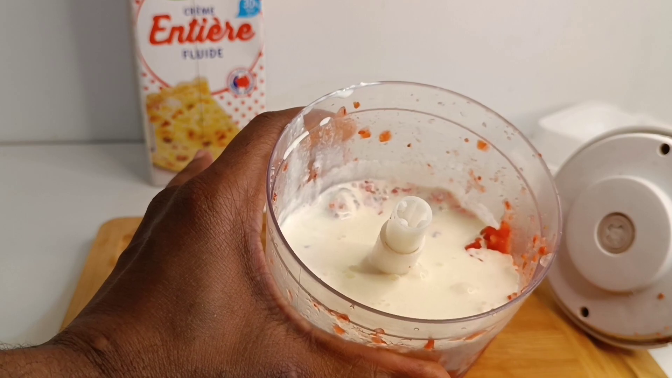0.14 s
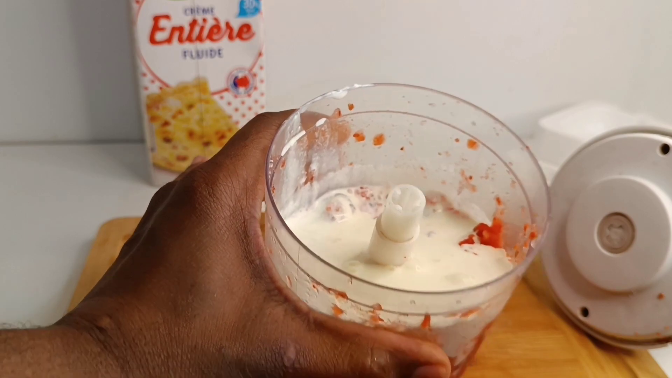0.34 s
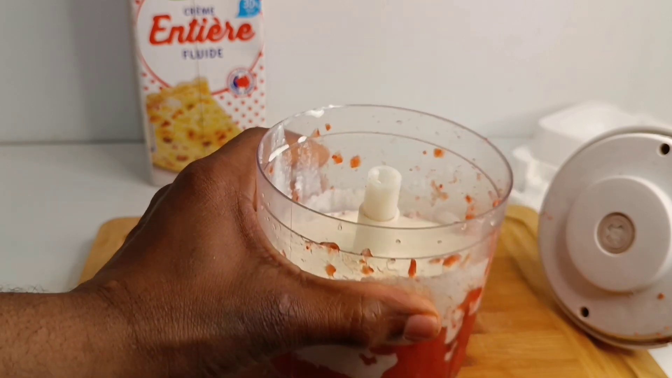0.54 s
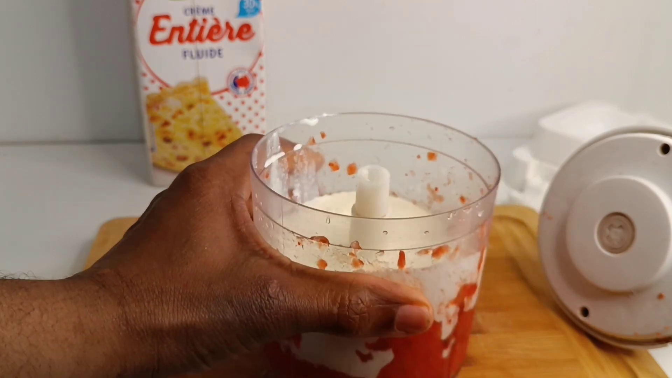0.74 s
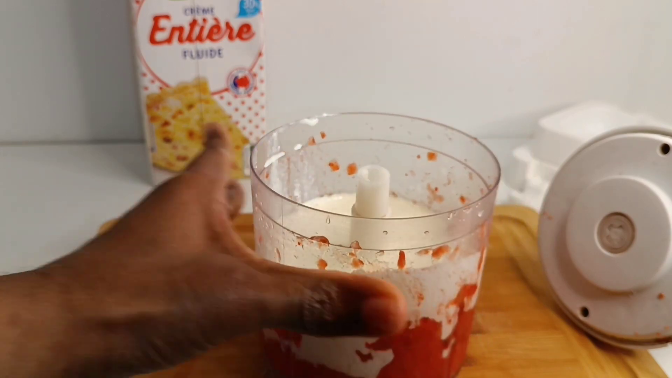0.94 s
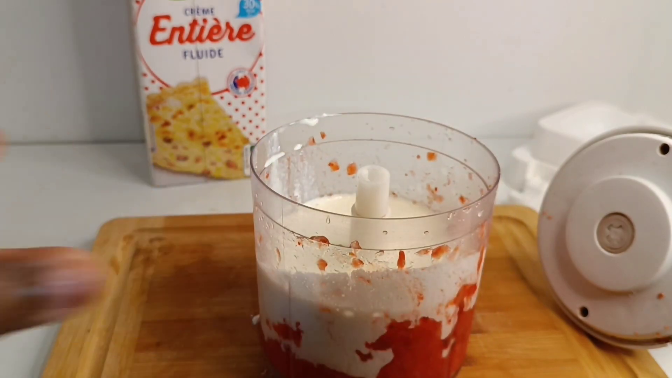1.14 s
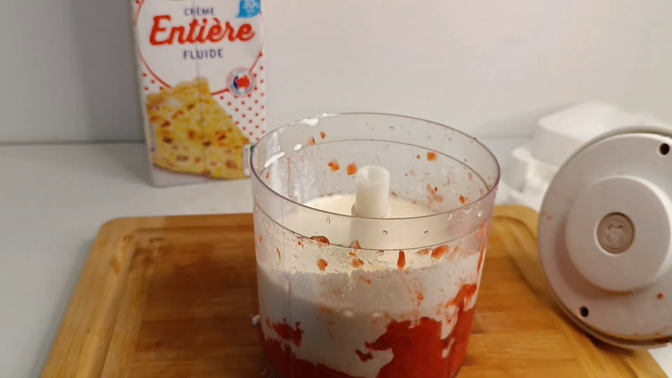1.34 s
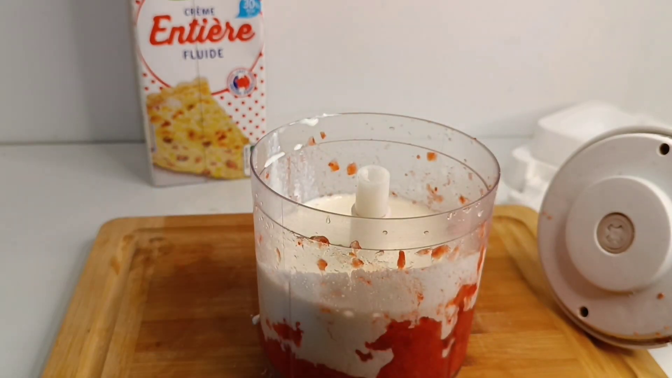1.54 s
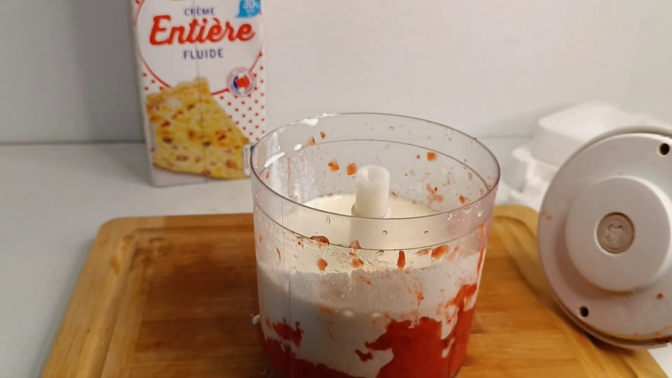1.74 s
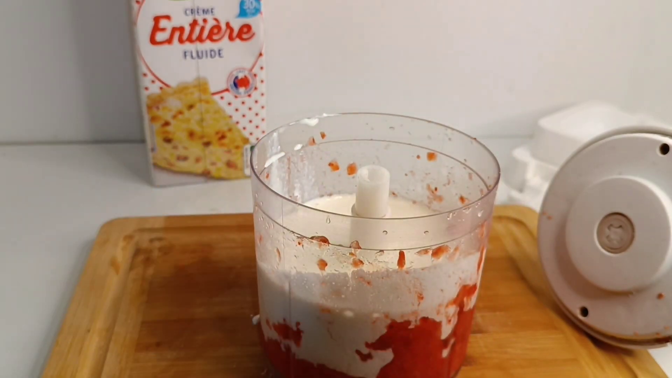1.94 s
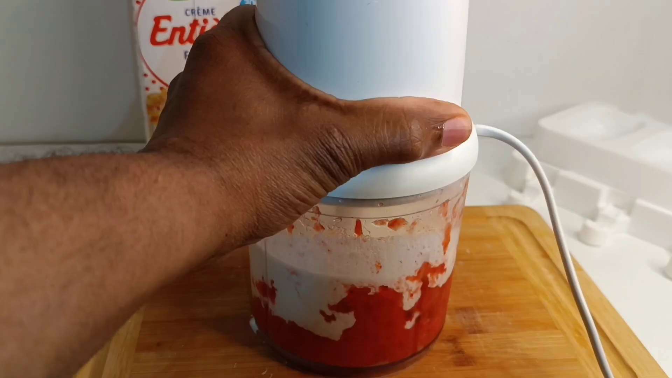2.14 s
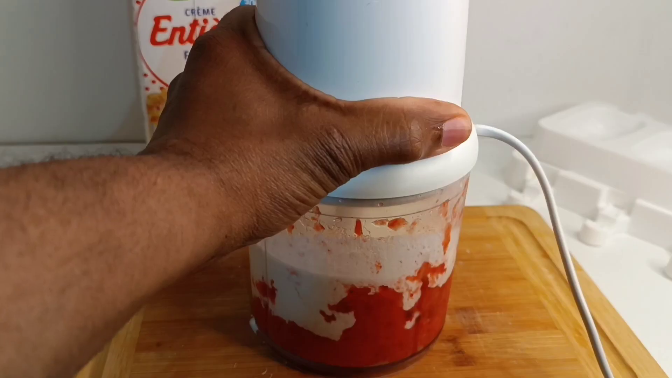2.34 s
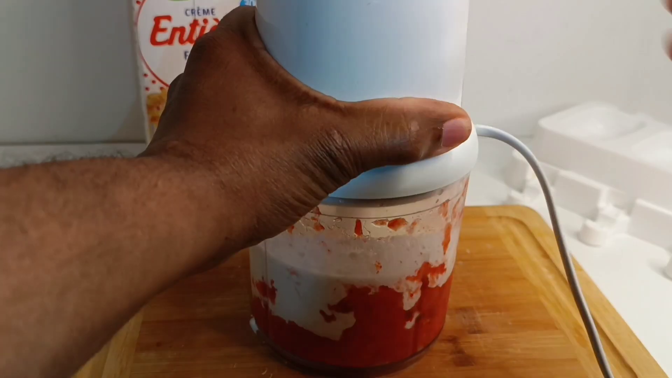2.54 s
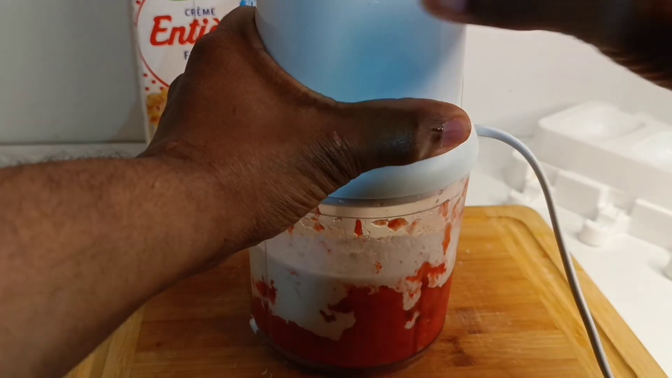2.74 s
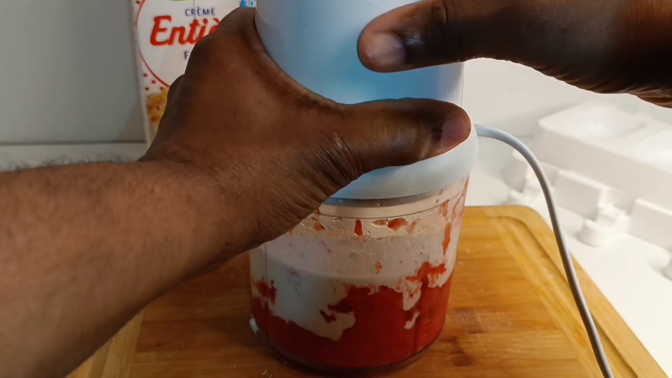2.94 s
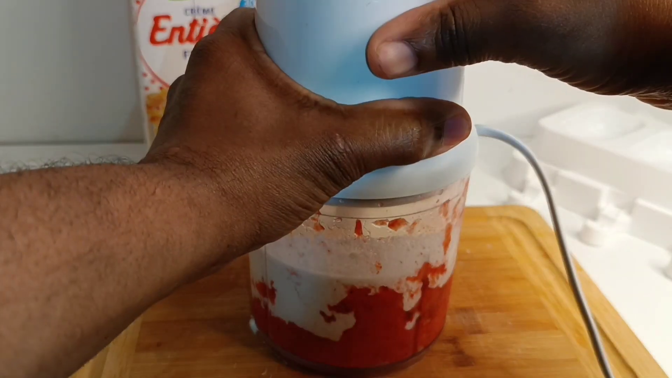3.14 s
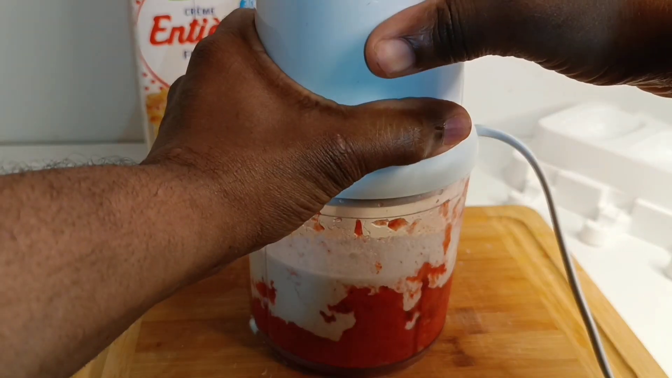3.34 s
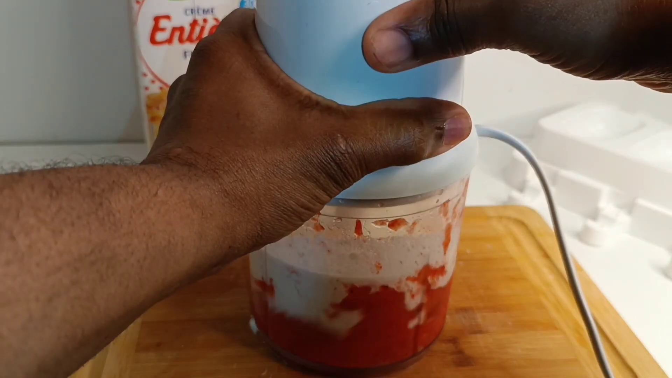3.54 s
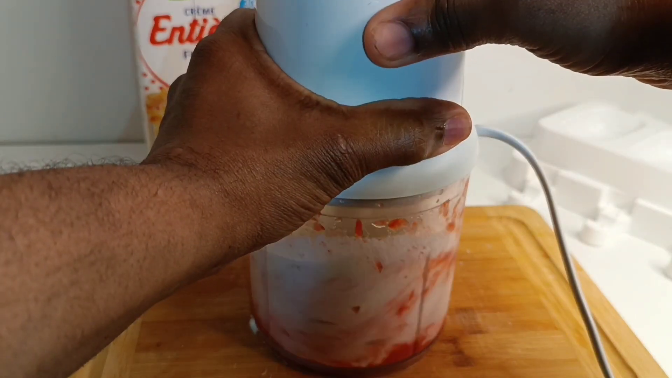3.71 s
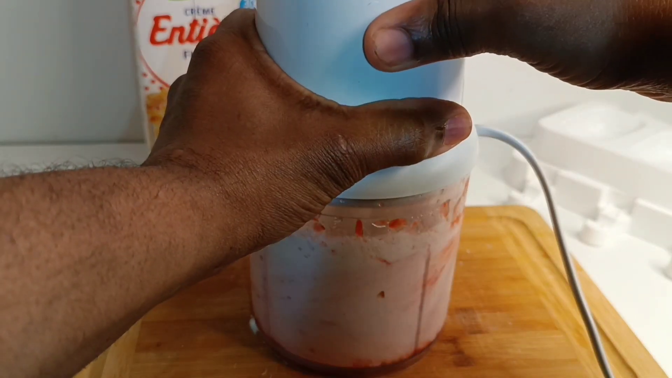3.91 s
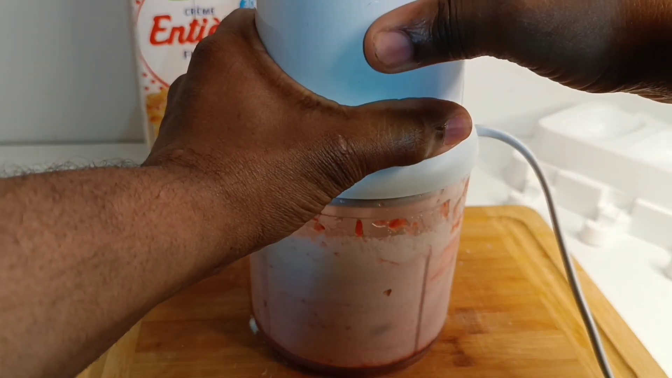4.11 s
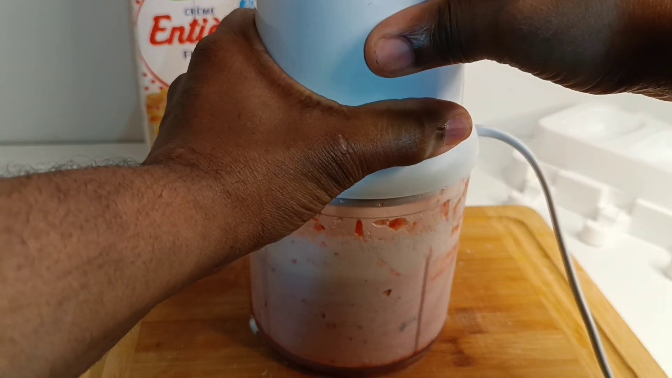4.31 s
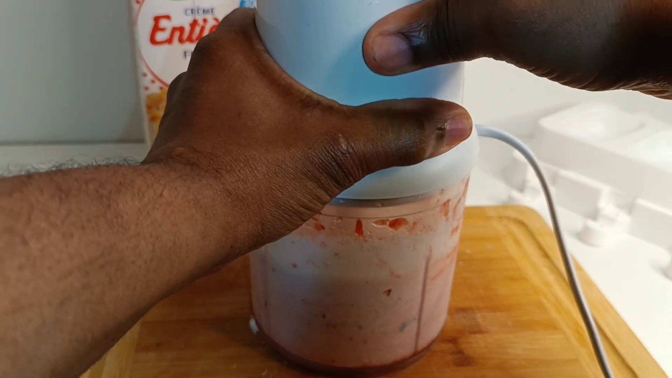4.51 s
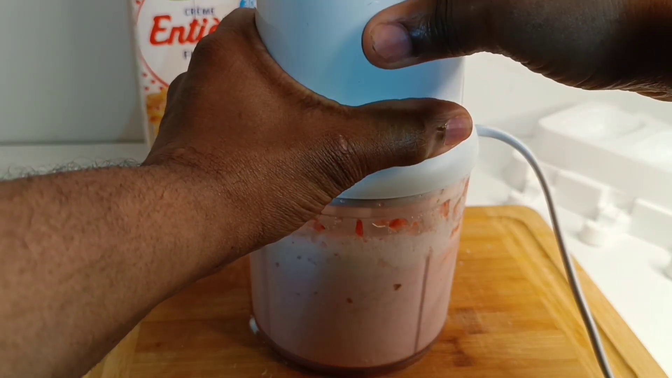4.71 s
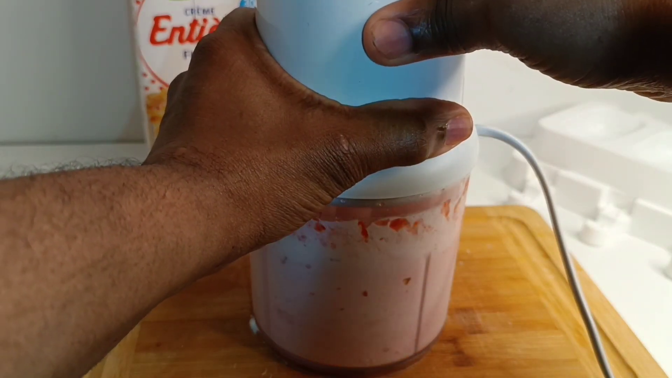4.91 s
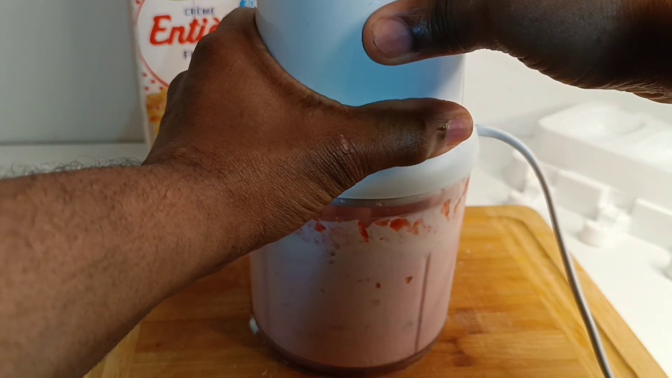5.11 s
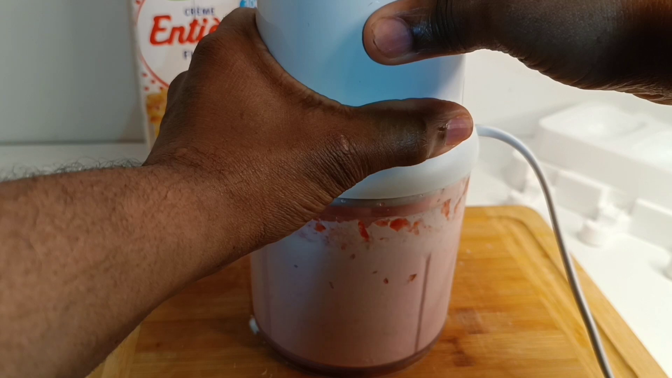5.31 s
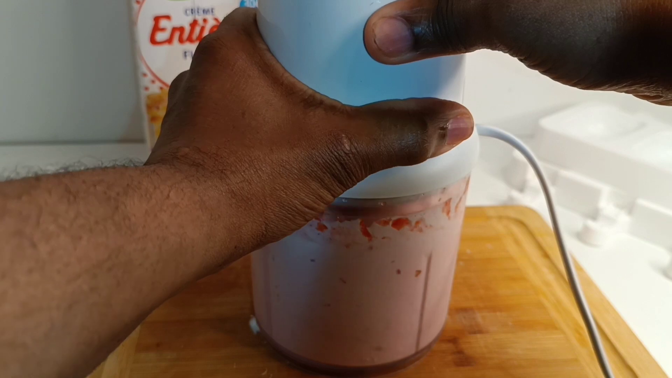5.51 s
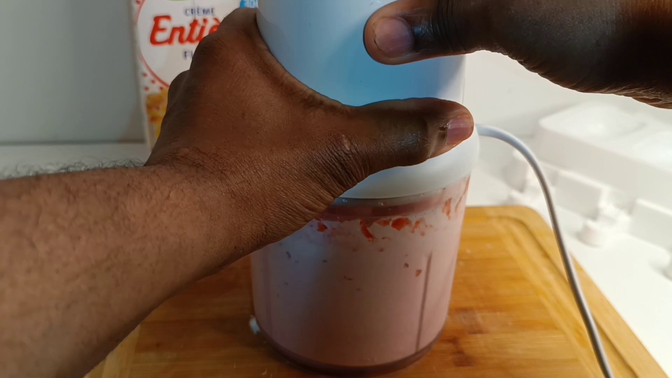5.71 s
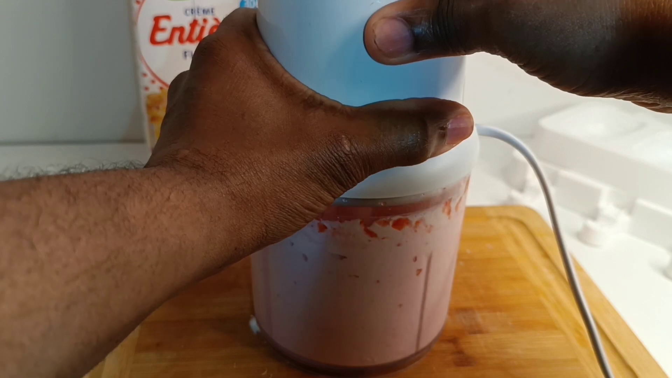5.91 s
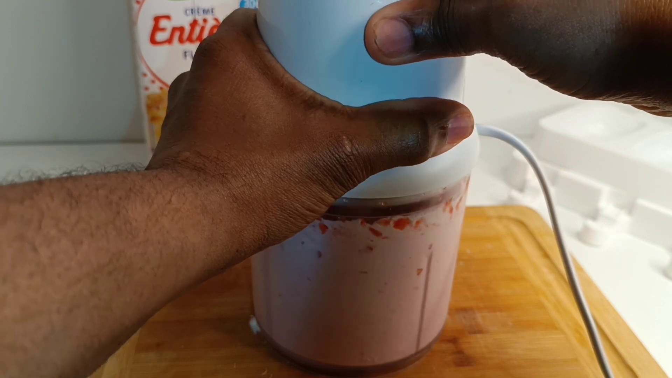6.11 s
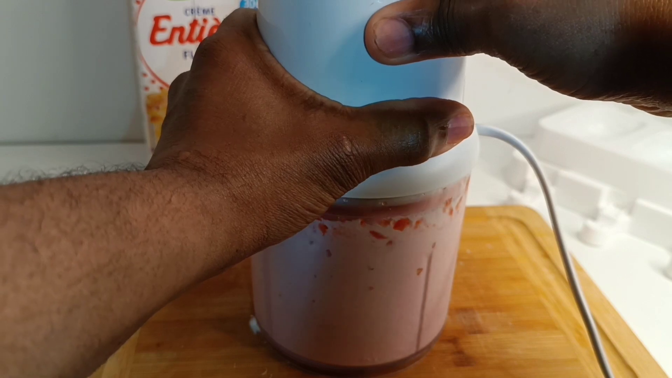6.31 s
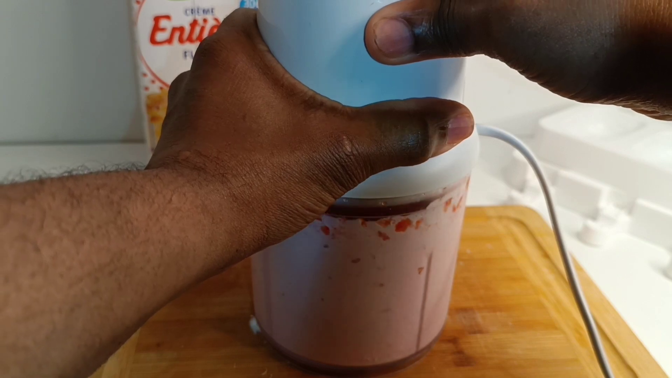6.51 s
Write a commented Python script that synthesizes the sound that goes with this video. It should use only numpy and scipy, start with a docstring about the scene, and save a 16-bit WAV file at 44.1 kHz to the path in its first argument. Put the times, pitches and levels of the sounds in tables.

```python
"""Over the low hush of a kitchen, a plastic chopper bowl of frozen fruit and cream is set down on a wooden board:
low thumps and ringing bowl modes. Hands slide on the plastic, and the motor is seated with more knocks.
The mains motor runs in a short burst, coasts to rest, then runs on: its gears whine and rattle, the blade smashes
the fruit (random blows ring the bowl), and the pitch sags and recovers as the thickening cream drags on it."""
import sys
import numpy as np
from scipy import signal
from scipy.fft import rfft, irfft, next_fast_len
from scipy.io import wavfile
from scipy.ndimage import uniform_filter1d, map_coordinates

SR = 44100
rng = np.random.default_rng(int(sys.argv[2]) if len(sys.argv) > 2 else 0)


def put_to_file(sound):
    """Save the sound as 16-bit audio at rate SR, in the file named by the first command-line argument."""
    columns = np.atleast_2d(sound).T  # one column per channel
    safe = np.clip(columns, -1, 1)
    whole_steps = np.round(safe * 32767)
    wavfile.write(sys.argv[1], SR, whole_steps.astype(np.int16))


N = 288855
TIME = np.arange(N) / SR
MAINS_HZ = 50
TOOTH_HZ = 2693.5   # gear tooth rate at full speed

# Hard knocks of bowl, motor and button. Each row: start in seconds, thump level in dB, thump pitch in Hz,
# clack level in dB, treble cut of the soft contact in Hz, tick level in dB.
KNOCK_ROWS = [(0.3672, -15, 133, -11.5, 4276, -61), (0.43, -27, 170.4, -25, 3500, -77),
              (1.64, -71, 140.4, -73, 3000, -87), (2.195, -58, 120, -53.5, 1200, -84.5),
              (2.393, -79, 120, -54, 4010, -60.5), (2.5526, -27.5, 127.3, -23.5, 900, -38.5),
              (2.993, -29, 190, -43.5, 2510, -43), (3.19, -54.5, 152.4, -68, 4150, -51),
              (3.2495, -19, 243, -26, 1400, -43.5), (3.914, -33.5, 156.6, -26, 750, -70),
              (4.11, -55, 121, -48.5, 1500, -63.5), (4.152, -41, 161, -65, 3500, -51)]
# The button is held. Each row: on in seconds, off in seconds.
BUTTON_HOLDS = [(3.245, 3.587), (4.27, 6.6)]


def from_db(db):
    """Decibels are logarithmic: 20 dB is a tenfold gain."""
    return 10 ** (np.asarray(db) / 20)


def rms_one(x):
    """Normalise to unit mean power."""
    return x / np.sqrt(np.mean(x ** 2) + 1e-20)


def in_time(rows):
    """Linear interpolation gives each column of a curve at every sample."""
    s, *columns = np.transpose(rows)
    return [np.interp(TIME, s, column) for column in columns]


def at_hz(points, hz):
    """Interpolate a table on a log-frequency axis, as pitch is heard."""
    table_hz, values = np.array(points).T
    return np.interp(np.log(hz), np.log(table_hz), values)


def drift(rate):
    """A smoothed random process of spread 1, changing about rate times a second."""
    knots = rng.standard_normal(N)
    return rms_one(map_coordinates(knots, [TIME * rate + 2], order=2))


def swells(rows):
    """Gaussian rises; each row: time in seconds, height, half length to 1/e in seconds."""
    return sum(height * np.exp(-((TIME - s) / length) ** 2) for s, height, length in rows)


def bursts(rows):
    """Gaussian gains; each row: time in seconds, peak in dB, half length to 1/e in seconds."""
    return swells([(s, from_db(db), length) for s, db, length in rows])


def low_pass(x, hz):
    """Second-order roll-off."""
    return signal.sosfilt(signal.butter(2, min(hz, .45 * SR), fs=SR, output="sos"), x + 1e-18)


def colour(x, spectrum):
    """Spectral shaping, falling away steeply outside the table's ends; rms 1."""
    hz = np.fft.rfftfreq(N, 1 / SR) + 1
    low_end = 1 / (1 + (spectrum[0][0] / hz) ** 4)
    high_end = 1 / (1 + (hz / spectrum[-1][0]) ** 20)
    return rms_one(irfft(rfft(x) * from_db(at_hz(spectrum, hz)) * low_end * high_end, N))


def boost(x, peaks):
    """Causal resonances raise or lower narrow bands."""
    out = x
    for hz, width, db in peaks:
        b, a = signal.iirpeak(hz, hz / width, fs=SR)
        out = out + (from_db(db) - 1) * signal.lfilter(b, a, x + 1e-18)
    return out


def spread(pair):
    """Interchannel coherence: two unrelated signals become left and right, alike in the bass only."""
    # Each row: frequency in Hz, left-right likeness from -1 to 1.
    likeness = [(60, 1), (150, 0.94), (300, 0.8), (600, .58), (1200, 0.29), (2400, 0.23), (5000, -0.14),
                (15000, 0.086)]
    alike = np.clip(at_hz(likeness, np.fft.rfftfreq(N, 1 / SR) + 1), -.99, .99)
    mid, side = irfft(rfft(pair) * np.sqrt([1 + alike, 1 - alike]), N)
    return np.array([mid + side, mid - side])


def noise():
    """White noise in two partly coherent channels."""
    return spread(rng.standard_normal((2, N)))


def ring(clicks, hz, t60):
    """A damped resonator: a unit click sets a sine of height 1 ringing, down 60 dB after t60 seconds."""
    radius, angle = from_db(-60 / (t60 * SR)), 2 * np.pi * hz / SR
    return signal.lfilter([0, np.sin(angle)], [1, -2 * radius * np.cos(angle), radius ** 2], clicks + 1e-18)


def hush():
    """Steady room tone as filtered noise."""
    # Each row: frequency in Hz, density in dB per Hz (relative).
    hush_spectrum = [(24, -33.5), (40, -16), (135, -1), (216, -11), (244, -2.5), (313, -14.5), (346, 2),
                     (454, -19.5), (490, -6), (527, -17.5), (1320, -21.5), (1610, -21.5), (1780, -18.5),
                     (8480, -36), (15000, -46)]
    return from_db(-68) * colour(noise(), hush_spectrum)


def thumps(t60, knock_attack_s, board_db, heavy_hz):
    """Impulse and mass: each blow gives a decaying low sine; slow, heavy blows also excite the board's modes."""
    # Soft thuds as the bowl settles and the hands shift. Each row: start in seconds, level in dB.
    thuds = [(0.31, -30), (0.513, -33.5), (0.636, -44), (0.711, -55.5), (0.997, -62), (1.468, -49),
             (1.591, -50.5), (3.116, -42), (4.167, -34.5)]
    # Board on the worktop. Each row: mode in Hz, level in dB before board_db, 60 dB decay in seconds.
    board_modes = [(100, 2, 0.35), (159, -4, .45), (228.5, -4, 0.32), (290, -25, 0.21)]
    thud_hz, thud_attack_s = 155, 0.0037
    out, pushes, t = np.zeros(N), np.zeros(N), TIME[:SR // 2]
    hard = [(s, db, hz, knock_attack_s) for s, db, hz, *_ in KNOCK_ROWS]
    soft = [(s, db, thud_hz, thud_attack_s) for s, db in thuds]
    for s, db, hz, attack_s in hard + soft:
        start = int(s * SR)
        envelope = from_db(db - 60 * t / t60) * (1 - np.exp(-t / attack_s))
        out[start:start + len(t)] += envelope * np.sin(2 * np.pi * hz * t)
        pushes[start] = from_db(db) / (1 + (hz / heavy_hz) ** 4)
    for k, (hz, db, fade) in enumerate(board_modes):
        out = out + (-1) ** k * from_db(db + board_db) * ring(pushes, hz, fade)
    return signal.sosfilt(signal.butter(2, [75, 420], "band", fs=SR, output="sos"), out)


def bowl(clicks, damping):
    """Modal superposition: blows ring all the modes of the filled bowl, and damping divides their decay times."""
    # Each row: mode in Hz, level in dB, 60 dB decay in seconds at damping 1.
    bowl_modes = [(283, -20.5, 0.4), (444.6, 0, 0.19), (627.3, -4, 0.072), (763, -4, 0.14), (827, 1, 0.034),
                  (1241, 5.5, 0.08), (1303, -1.5, 0.033), (1500, 1, 0.077), (1910, -5, 0.021),
                  (2020, 0, 0.046), (2130, -4, 0.054), (2490, -6, 0.025), (2480, -18, .04),
                  (2920, -14.5, 0.033), (3680, -20, 0.044), (4230, -8.5, 0.044)]
    return sum((-1) ** k * from_db(db) * ring(clicks, hz, t60 / damping)
               for k, (hz, db, t60) in enumerate(bowl_modes))


def knocks(bowl_db, clack_s, tick_s):
    """Contact stiffness sets the treble of a blow: each clacks, rings the bowl and gives a plastic tick."""
    # Bowl on board. Each row: frequency in Hz, density in dB per Hz (relative).
    clack_spectrum = [(200, 1), (440, -0.5), (520, -11.5), (630, 9), (740, 2.5), (930, -11.5), (1220, 1.5),
                      (1650, -11.5), (2300, 0), (2700, -18), (3100, -12.5), (4300, -20.5), (5200, -33.5),
                      (7000, -35), (12000, -45.5)]
    # Plastic tick. Each row: frequency in Hz, density in dB per Hz (relative).
    tick_spectrum = [(1500, -12.5), (3500, 3.5), (4900, -2.5), (7000, -2.5), (9000, -13.5), (13000, -9),
                     (15000, 8.5), (16000, -8.5)]
    blows, ticks = np.zeros((2, N))
    clacks, t, grit = np.zeros((2, N)), TIME[:SR // 2], colour(noise(), clack_spectrum)
    for s, _, _, clack_db, soft_hz, tick_db in KNOCK_ROWS:
        span = slice(int(s * SR), int(s * SR) + len(t))
        blows[span] += from_db(clack_db) * low_pass(t == 0, soft_hz)
        crowded_modes = grit[:, span] * np.exp(-t / clack_s)   # many short modes sound like noise
        clacks[:, span] += from_db(clack_db) * low_pass(crowded_modes, soft_hz)
        ticks[span] += from_db(tick_db) * np.exp(-t / tick_s)
    ringing = from_db(bowl_db) * bowl(blows, damping=0.68)
    return ringing + clacks + ticks * colour(noise(), tick_spectrum)


def kitchen_echo(build_s, near_db, near_s):
    """Reverberation: close reflections from worktop and wall, then a tail that dies sooner in the treble."""
    # Each row: frequency in Hz, 60 dB decay in seconds.
    decay_times = [(300, 0.36), (700, 0.43), (2000, 0.49), (5000, .3), (15000, 0.11)]
    t, white, out = TIME[:SR], noise()[:, :SR], 0
    edges = np.geomspace(260, 17000, 9)
    for low, high in zip(edges, edges[1:]):
        band = signal.sosfilt(signal.butter(2, [low, high], "band", fs=SR, output="sos"), white)
        out = out + band * np.exp(-np.log(1000) * t / at_hz(decay_times, np.sqrt(low * high)))
    out = out * (1 - np.exp(-t / build_s)) * (1 + from_db(near_db) * np.exp(-t / near_s))
    return rms_one(out) / np.sqrt(SR)


def reflect(x, echo):
    """Convolution with the impulse response gives what the room sends back."""
    return signal.fftconvolve(np.atleast_2d(x), echo, axes=1)[:, :N]


def hand_slides():
    """Stick-slip friction: the hand slides on the plastic, and skin grips and slips unevenly."""
    # Each row: time in seconds, level in dB, half length in seconds.
    slides = [(.61, -72, 0.081), (1.1, -74, .11), (2.2, -73.5, 0.073), (2.54, -56, 0.096),
              (2.77, -72.5, 0.048)]
    # Each row: frequency in Hz, density in dB per Hz (relative).
    rub_spectrum = [(1500, -8), (4000, -5.5), (6200, 0), (9000, -13.5), (13500, -17), (15200, 3),
                    (16000, -6.5)]
    return bursts(slides) * from_db(1.57 * drift(39.5)) * colour(noise(), rub_spectrum)


def shaft_speed():
    """Rotational inertia: share of full speed, rising fast while the button is held, then coasting to rest."""
    spin_up_s, spin_up_curve = .128, .58   # the motor leaps off, then nears full speed slowly
    coast_s, friction = .183, .1   # drag time constant; dry friction as a share of full speed
    speed = 0
    for on, off in BUTTON_HOLDS:
        held_s = np.maximum(np.minimum(TIME, off) - on, 0)
        rise = (1 - np.exp(-held_s / spin_up_s)) ** spin_up_curve
        coast = (1 + friction) * np.exp(-np.maximum(TIME - off, 0) / coast_s) - friction
        speed = speed + rise * np.maximum(coast, 0)
    return speed


def grains(per_s, size_db):
    """A Poisson-like shower: icy bits hit the wall at random, a few much harder than the rest."""
    sizes = from_db(size_db * np.minimum(rng.exponential(1, N), 4))
    return (rng.random(N) < per_s / SR) * sizes * rng.standard_normal((2, N))


def churn_noise(sweep):
    """Turbulence: low noise of the stirred heap, modulated by the sweeping blade."""
    # Each row: frequency in Hz, density in dB per Hz (relative).
    churn_spectrum = [(29, -58.5), (50, -25), (82, -8.5), (97, -9), (130, -4), (307, -3), (393, -7),
                      (437, -10.5), (536, -17), (650, -18), (840, -65.5), (1430, -120)]
    return colour(noise() * sweep, churn_spectrum)


def fruit_blows(chopping, sweep):
    """Impact excitation: shards ring the bowl, and heavier blows crunch lower."""
    # Chopped fruit. Each row: frequency in Hz, density in dB per Hz (relative).
    chop_spectrum = [(450, -12), (545, -14.5), (680, -6.5), (900, 2.5), (1090, -8), (1240, 3), (1370, -1.5),
                     (1490, 2.5), (1720, -4), (1850, -14), (2300, -14), (3000, -30)]
    # Hard lumps caught by the blade, and the clunk as the motor stops at 3.92 s.
    # Each row: time in seconds, level in dB, half length in seconds.
    lump_and_clunk_rows = [(3.272, -24, 0.013), (3.69, -31, 0.02), (3.771, -38, 0.005), (3.92, -40, 0.017),
                           (5.158, -18, 0.015), (5.186, -22.5, 0.012), (5.245, -35, 0.013),
                           (5.686, -30, 0.018), (6.035, -24.5, 0.018)]
    hits = rms_one(bowl(spread(grains(per_s=2500, size_db=2.5)) * sweep, damping=1.3))
    bits = colour(spread(grains(per_s=7000, size_db=1.5)) * sweep, chop_spectrum)
    chop = chopping * (bits + from_db(-7.0) * hits)
    crunch = hits + colour(spread(grains(per_s=4500, size_db=3.5)), chop_spectrum)
    return chop + bursts(lump_and_clunk_rows) * rms_one(low_pass(crunch, 1700))


def gear_clatter(growling, rattling, rotor, mains):
    """Backlash: slack teeth clatter once a rotor turn and with each pull of the field."""
    # Growl. Each row: frequency in Hz, density in dB per Hz (relative).
    growl_spectrum = [(1700, -5.5), (2080, -3.5), (2380, 0.5), (2700, -1.5), (3000, -2.5), (3400, -10.5),
                      (4400, -14.5), (5000, -3.5)]
    # Rattle. Each row: frequency in Hz, density in dB per Hz (relative).
    rattle_spectrum = [(2800, 8.5), (3600, 2.5), (4500, -2), (5200, -5), (6200, 2), (7100, 0.5),
                       (8300, -12), (11000, -17.5), (13500, -28.5), (15000, -9.5), (16400, -17.5)]
    backlash = rms_one(from_db(0.8 * np.cos(rotor) + 0.45 * np.cos(mains) + 1.18 * drift(70)))
    growl = growling * colour(noise() * backlash, growl_spectrum)
    return growl + rattling * colour(noise() * backlash, rattle_spectrum)


def hum(speed, mains):
    """Force as field squared: the motor hums at twice the mains rate; the board rings on at 100 Hz after release."""
    # Hum in the burst, and the board's ringing after its release at 3.587 s.
    # Each row: time in seconds, mean level in dB at running speed.
    hum_burst = [(3.25, -47), (3.274, -26.5), (3.512, -21), (3.568, -25), (3.594, -35.5), (3.652, -23.5),
                 (3.688, -43), (3.86, -30), (3.98, -64.5)]
    # Hum in the long run. Each row: time in seconds, mean level in dB at running speed.
    hum_run = [(4.28, -42.5), (4.3, -29), (4.45, -20), (4.54, -29.5), (4.72, -23.5), (5.01, -31.5),
               (5.04, -23), (5.11, -23), (5.16, -40), (5.22, -21.5), (5.37, -43), (5.47, -24.5),
               (5.54, -40.5), (5.69, -29.5), (5.82, -45), (5.86, -34), (5.91, -46), (5.96, -31.5),
               (6.06, -39.5), (6.11, -27.5), (6.21, -31), (6.25, -37), (6.42, -38.5), (6.55, -42.5)]
    hum_db, = in_time(np.vstack([hum_burst, hum_run]))
    height = np.minimum(speed / .08, 1) * np.sqrt(2) * from_db(hum_db + 1.0 * drift(25))
    return height * np.sin(mains + 0.26 * drift(12))


def whine(tooth_hz, shake, jitter_hz, ripple, wobble, flutter_db, settled_db, slow_db, third_db, lead):
    """Gear mesh harmonics with sidebands from torque ripple and an off-centre wheel; blows shake the pitch."""
    # How loudly the housing sends out a gear tone. Each row: frequency in Hz, level in dB.
    radiation = [(300, -67), (800, -33.5), (1400, -21), (1900, -27.5), (2400, -31.5), (2700, -36),
                 (3300, -29), (4400, -34.5), (5100, -36), (5350, -30), (5700, -28)]
    teeth = 2 * np.pi * np.cumsum(tooth_hz + jitter_hz * shake * drift(420)) / SR
    wheel = teeth / 21 + .6 * drift(30)   # the wheel rocks on its pin
    teeth = teeth + ripple * shake * np.sin(4 * np.pi * MAINS_HZ * TIME)
    teeth = teeth + lead * np.array([[1], [-1]])   # left leads right in phase
    slowness = 1 - tooth_hz / TOOTH_HZ   # slow teeth meet softly and lose their octave
    # once the gears settle, the octave outweighs the fundamental
    overtones_db = [settled_db * (1 - shake), slow_db * slowness, third_db + 12 * shake]
    out = 0
    for k, db in enumerate(overtones_db, 1):
        tone_db = at_hz(radiation, k * tooth_hz + 1) + db + flutter_db * drift(90)
        tone = np.sin(k * teeth) + wobble * np.sin(k * teeth + wheel)
        out = out + np.sqrt(2) * from_db(tone_db) * tone
    return out


def pick_up_squeak():
    """A brief narrow-band sound: a thin squeak as the motor picks up."""
    # Each row: time in seconds, level in dB, half length in seconds.
    squeak_rows = [(4.362, -28, 0.011)]
    # Each row: frequency in Hz, density in dB per Hz (relative).
    squeak_spectrum = [(12000, -23), (14200, -18), (15200, 0), (16200, -6)]
    return bursts(squeak_rows) * colour(noise(), squeak_spectrum)


def chopper(echo):
    """Load and speed coupling: motor, gears and blade follow the shaft speed and the state of the fruit."""
    # A clump drags on the blade. Each row: time in seconds, tooth rate lost in Hz at full speed,
    # half length in seconds.
    drags = [(5.195, 155, .05), (5.465, 180.3, .07), (5.735, 150, .06), (6.08, 140.5, .05),
             (6.35, 90.9, .06)]
    # The heap of cream slumps onto the blade. Each row: time in seconds, level in dB, half length in seconds.
    slumps = [(3.71, -26, 0.031), (3.83, -27, 0.014), (5.025, -22, .03), (5.37, -28.5, 0.044),
              (5.72, -34.5, 0.02), (6.32, -34, 0.055)]
    # Swells of the gear growl. Each row: time in seconds, level in dB, half length in seconds.
    growl_swells = [(5.43, -37, 0.12), (6.04, -32, 0.023)]
    # Narrow resonances of the motor housing. Each row: frequency in Hz, width in Hz, boost in dB.
    housing = [(1710, 19, 7), (1906, 55, 8.5), (2242, 40, 3), (2352, 38, 7.5), (2450, 53, 5.5),
               (2654, 21, 2), (3080, 17, 8.5), (3664, 59, 4), (3900, 57, 2), (4420, 41, 9), (5220, 16, -2),
               (5260, 33, 5), (5716, 118, 10.5), (6080, 100, 3.5), (6990, 90, -3)]
    broken_s, breaking_s = 4.92, .042   # when the hard fruit gives way to cream, and how quickly
    easing_hz_per_s = 50   # the tooth rate creeps up once the fruit is broken
    full_drag_hz = 150
    freewheel_db = -4   # the teeth sing less when the motor does not drive them

    speed, sag_hz = shaft_speed(), swells(drags)
    broken = .5 + .5 * np.tanh((TIME - broken_s) / (2 * breaking_s))
    held = sum((TIME > on) & (TIME < off) for on, off in BUTTON_HOLDS)
    undriven = uniform_filter1d(1. - held, size=900)
    creaming_s = np.maximum(TIME - broken_s, 0)
    tooth_hz = speed * (TOOTH_HZ + easing_hz_per_s * creaming_s - sag_hz)

    def level(db, knee, broken_db, db_per_s, drag_db):
        """Saturating growth with speed up to the knee, plus dB offsets for breaking, creaming and drag."""
        load_db = broken_db * broken + db_per_s * creaming_s + drag_db * sag_hz / full_drag_hz
        return from_db(db + load_db) * speed ** 2 / (speed ** 2 + knee ** 2)

    churning = level(db=-23.5, knee=0.14, broken_db=-9.5, db_per_s=-2.5, drag_db=0.0) + bursts(slumps)
    chopping = level(db=-23.5, knee=0.21, broken_db=-5.0, db_per_s=-4.5, drag_db=2.5)
    growling = level(db=-25.0, knee=0.24, broken_db=-4.0, db_per_s=-2.5, drag_db=-1.4) + bursts(growl_swells)
    rattling = level(db=-21.5, knee=0.46, broken_db=-11.0, db_per_s=-0.17, drag_db=1.0)
    rocking = level(db=-24.5, knee=0.81, broken_db=-3.0, db_per_s=-2.6, drag_db=-12)
    singing = level(db=0.96, knee=0.092, broken_db=-1.05, db_per_s=-0.3, drag_db=0.5)
    singing = singing * from_db(freewheel_db * undriven)
    # hard fruit shakes the gear train
    shake = level(db=.5, knee=.5, broken_db=-13.5, db_per_s=1.1, drag_db=2.0)

    rotor = 2 * np.pi * np.cumsum(tooth_hz / 8.5) / SR
    mains = 4 * np.pi * MAINS_HZ * TIME   # the field pulls twice a cycle
    # the geared-down blade meets the heap once a turn
    sweep = rms_one(from_db(1.0 * np.cos(rotor / 5) + 1.0 * drift(70)))
    machine = churning * churn_noise(sweep) + fruit_blows(chopping, sweep)
    machine = machine + gear_clatter(growling, rattling, rotor, mains) + hum(speed, mains)
    # an uneven load rocks the rotor once a turn
    machine = machine + rocking * from_db(4.3 * drift(18)) * np.sin(rotor)
    gears = singing * whine(tooth_hz, shake, jitter_hz=78.0, ripple=0.2, wobble=0.47, flutter_db=2.0,
                            settled_db=-5, slow_db=-11, third_db=-31, lead=0.38)
    near = echo * np.exp(-TIME[:SR] / 0.05)   # close by, the first reflections dominate
    gears = gears + from_db(-2) * reflect(gears, near)
    machine = boost(machine + gears + pick_up_squeak(), housing)
    return machine + from_db(-24.0) * reflect(machine, echo)


def balance(x):
    """Interchannel level difference: each side takes half of a left-right ratio that varies with frequency."""
    # Each row: frequency in Hz, left over right in dB.
    left_over_right = [(90, 0.5), (250, 2.5), (450, 0.5), (750, 2), (1500, 2.5), (2400, 2), (2800, 0),
                       (4500, -1.5), (5250, -4), (5540, 1), (5750, -3), (7000, -4.5), (9000, 4), (15000, 1)]
    size = next_fast_len(N + SR)
    ratio_db = at_hz(left_over_right, np.fft.rfftfreq(size, 1 / SR) + 1)
    sides = from_db(ratio_db * np.array([[.5], [-.5]]))
    return irfft(rfft(x, size) * sides, size)[:, :N]


def scene():
    """Superposition: handling and chopping on the worktop, over the low hush of the kitchen."""
    echo = kitchen_echo(build_s=.01, near_db=9.0, near_s=0.0092)
    handling = thumps(t60=0.15, knock_attack_s=0.00092, board_db=-7.0, heavy_hz=174.7)
    handling = handling + knocks(bowl_db=-23.5, clack_s=0.0091, tick_s=0.0058)
    handling = handling + from_db(-5.5) * reflect(handling, echo)
    return balance(hush() + handling + hand_slides() + chopper(echo))


def record(dry):
    """Soft saturation rounds the highest peaks, and an elliptic low-pass cuts the top steeply."""
    cutoff_hz = 15900
    rounded = dry / (1 + (np.abs(dry) / .72) ** 8) ** (1 / 8)
    return signal.sosfilt(signal.ellip(10, .1, 90, cutoff_hz, fs=SR, output="sos"), rounded)


dry = scene()
out = record(dry)
put_to_file(out)
```